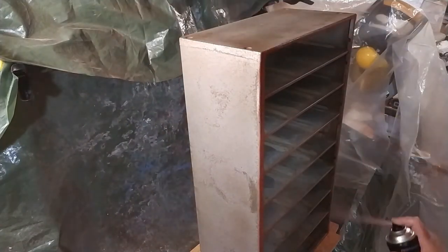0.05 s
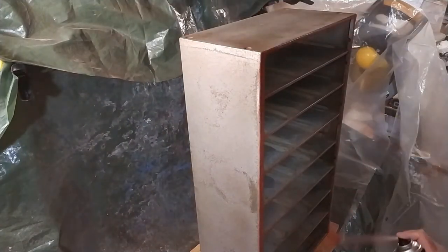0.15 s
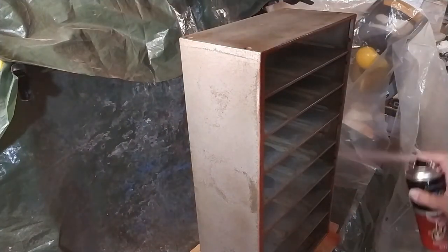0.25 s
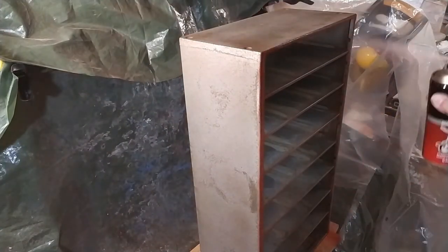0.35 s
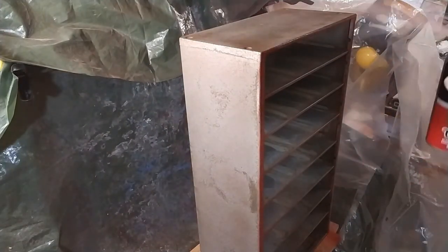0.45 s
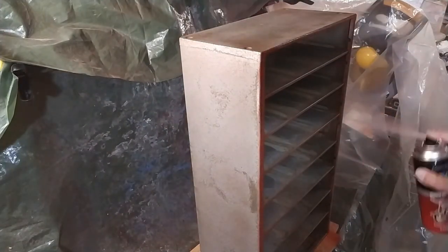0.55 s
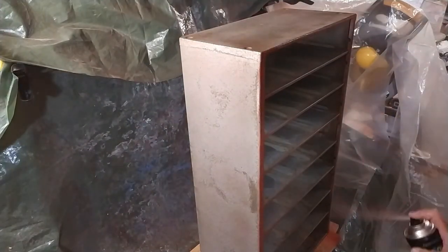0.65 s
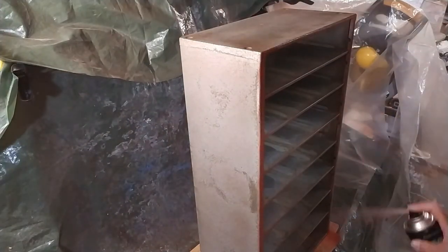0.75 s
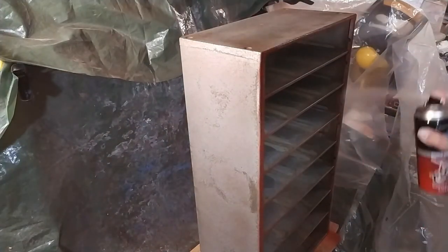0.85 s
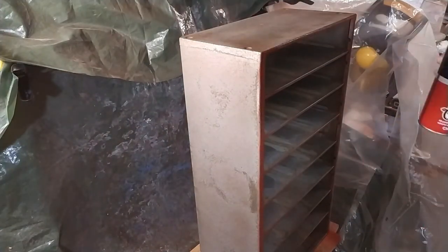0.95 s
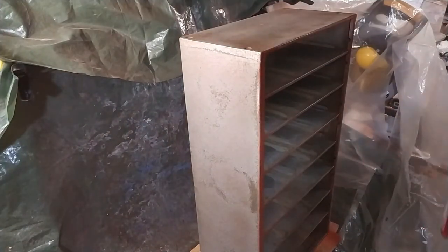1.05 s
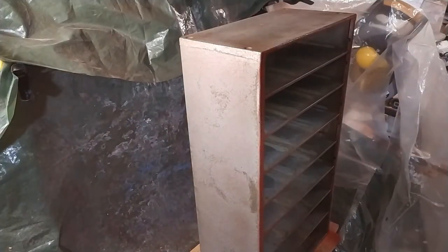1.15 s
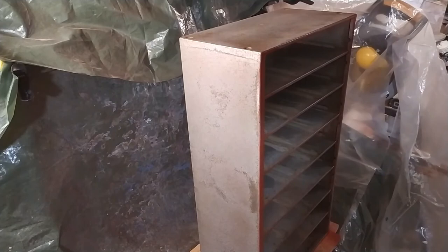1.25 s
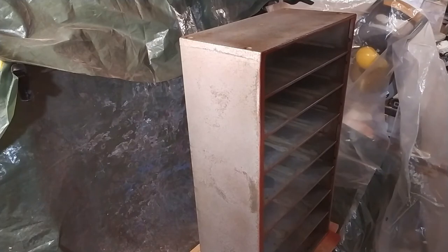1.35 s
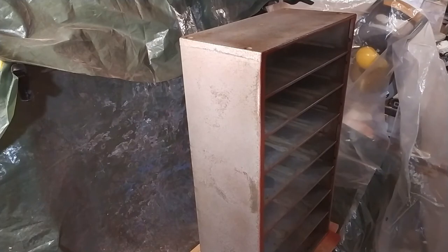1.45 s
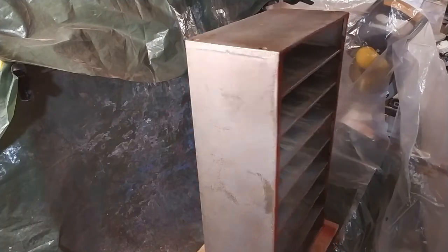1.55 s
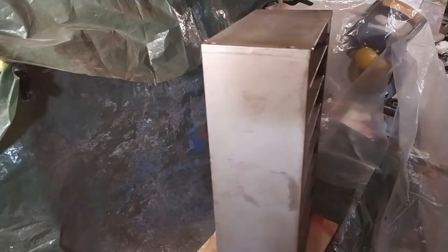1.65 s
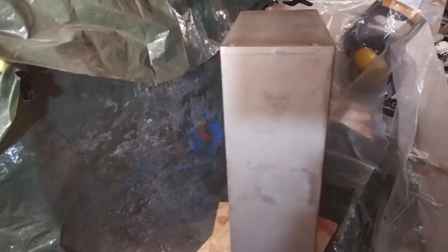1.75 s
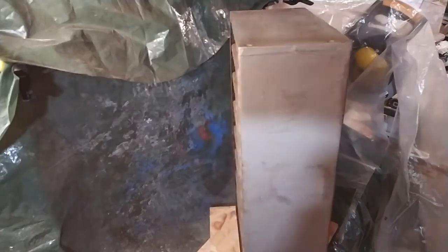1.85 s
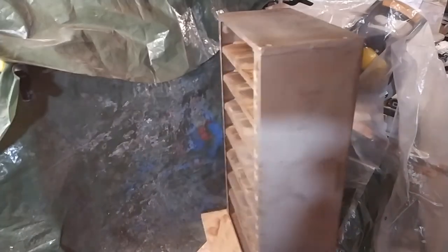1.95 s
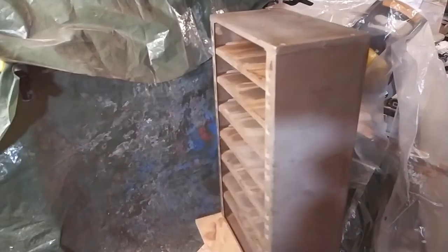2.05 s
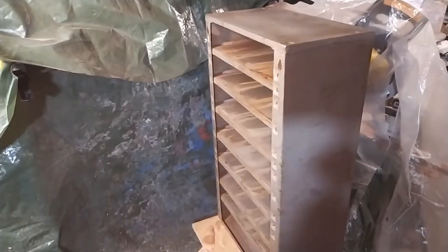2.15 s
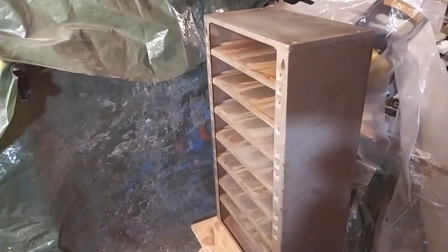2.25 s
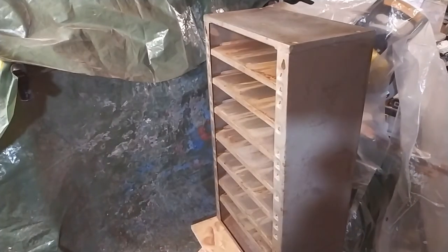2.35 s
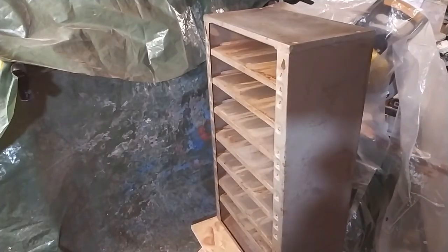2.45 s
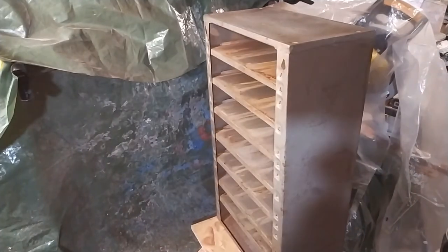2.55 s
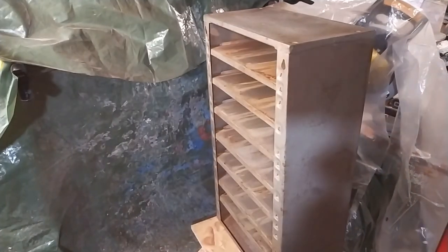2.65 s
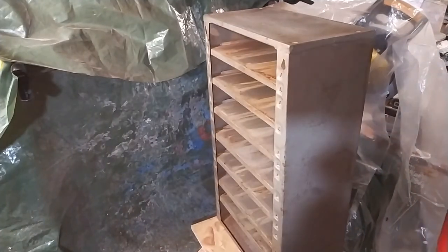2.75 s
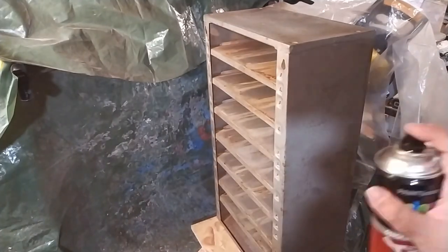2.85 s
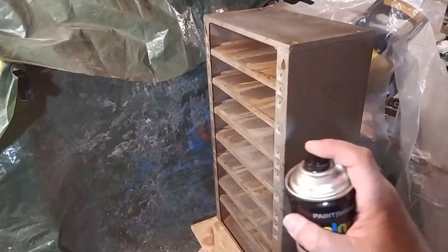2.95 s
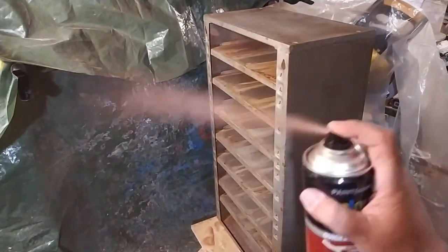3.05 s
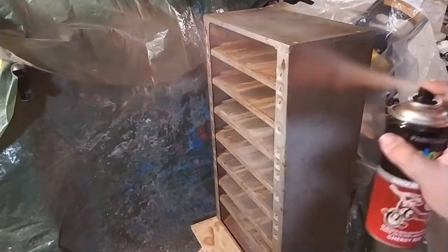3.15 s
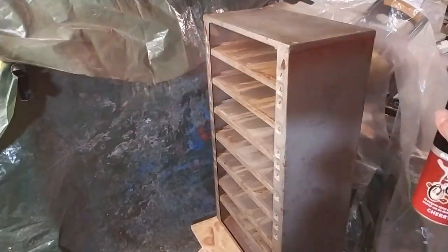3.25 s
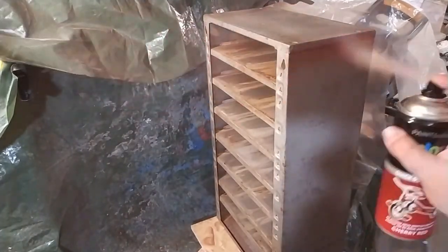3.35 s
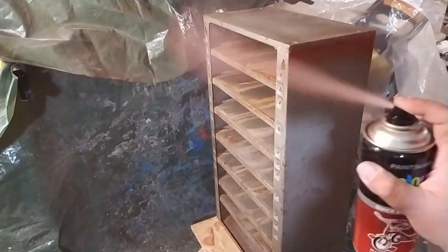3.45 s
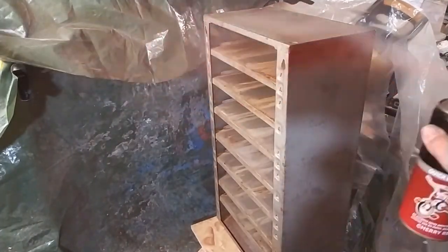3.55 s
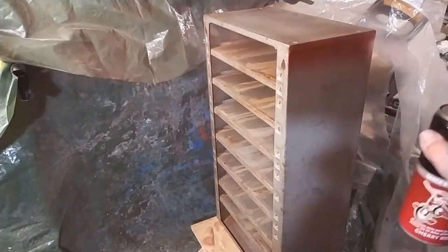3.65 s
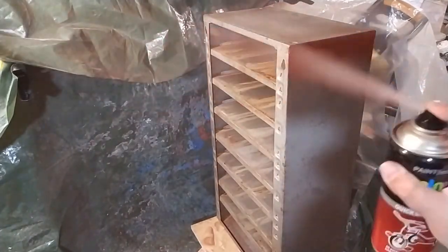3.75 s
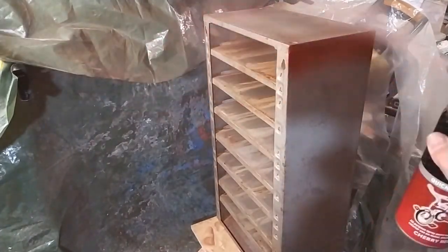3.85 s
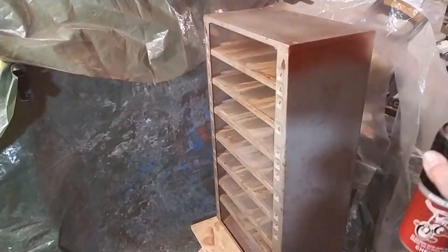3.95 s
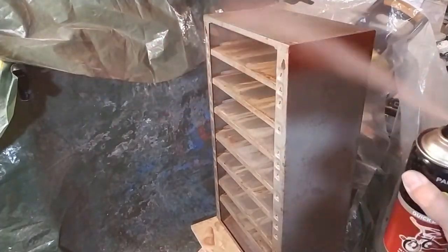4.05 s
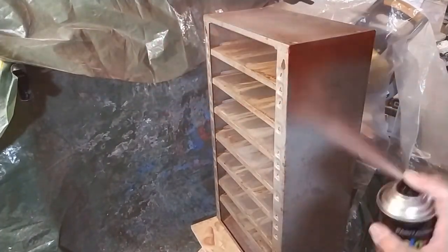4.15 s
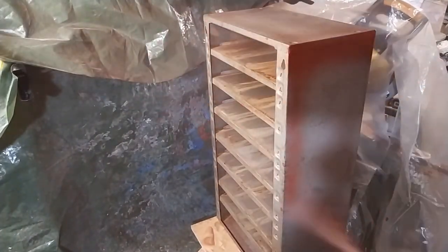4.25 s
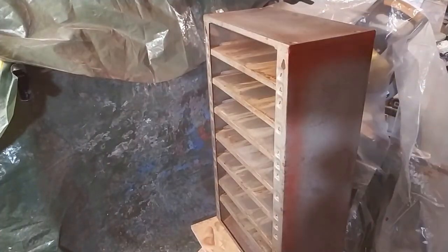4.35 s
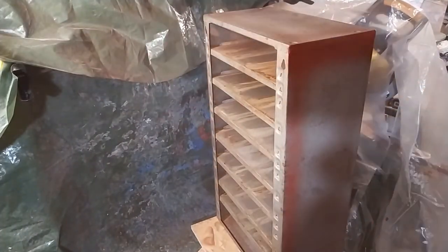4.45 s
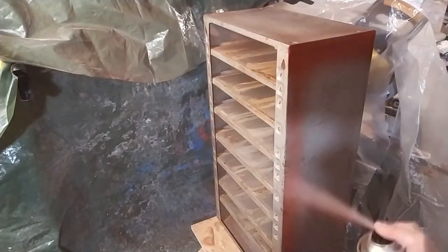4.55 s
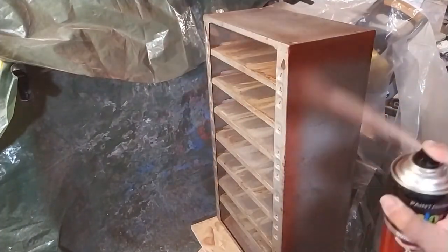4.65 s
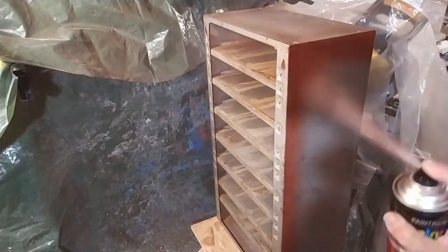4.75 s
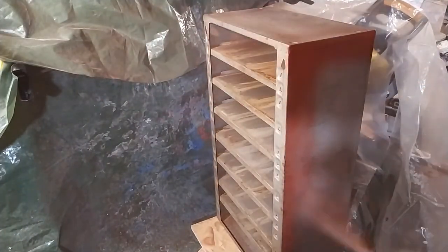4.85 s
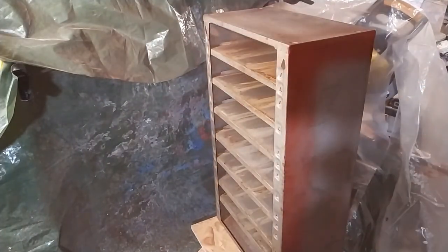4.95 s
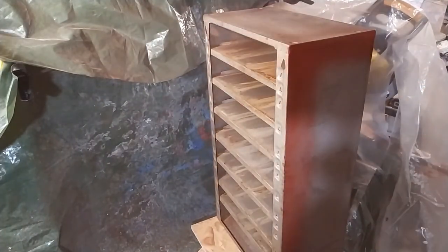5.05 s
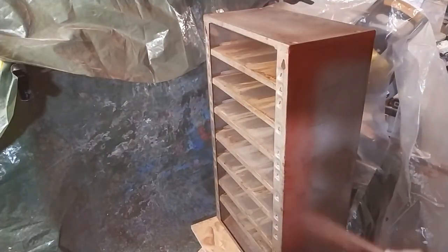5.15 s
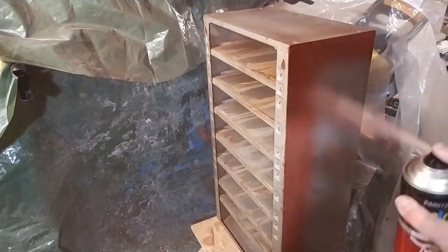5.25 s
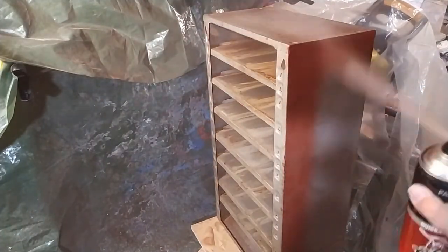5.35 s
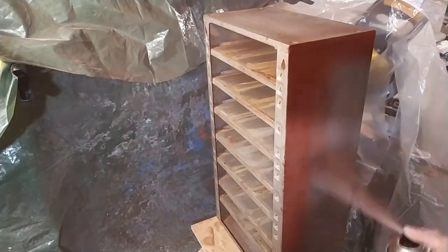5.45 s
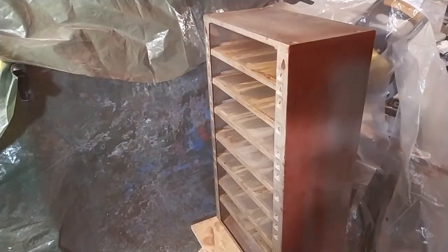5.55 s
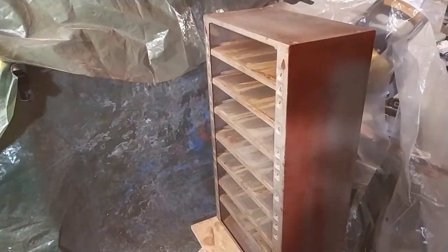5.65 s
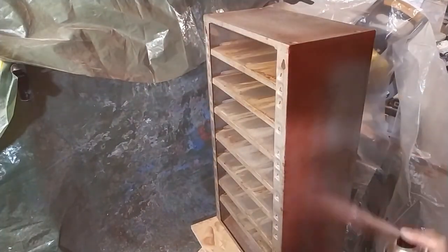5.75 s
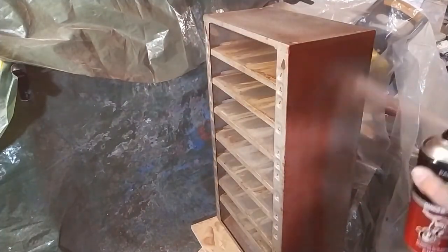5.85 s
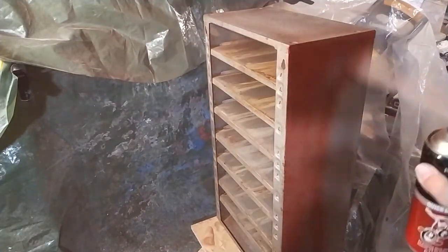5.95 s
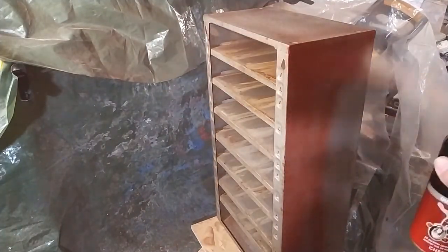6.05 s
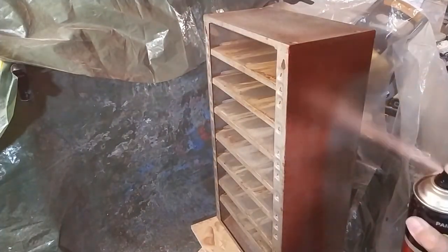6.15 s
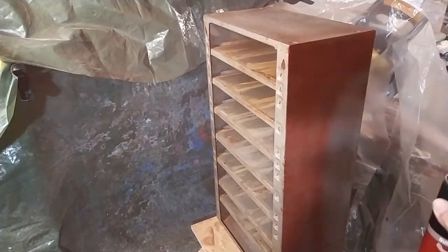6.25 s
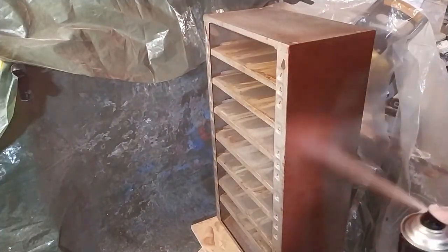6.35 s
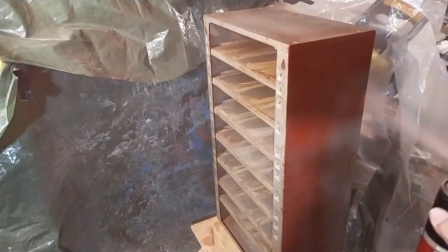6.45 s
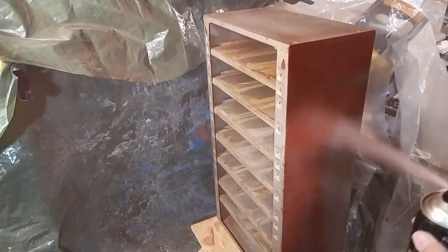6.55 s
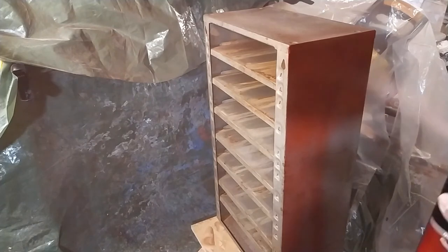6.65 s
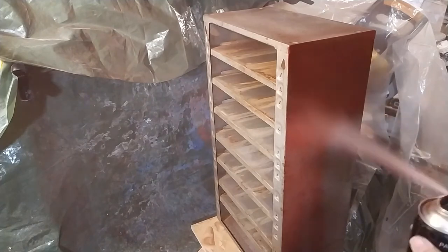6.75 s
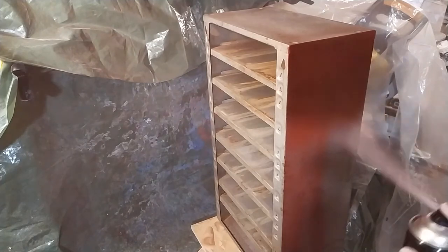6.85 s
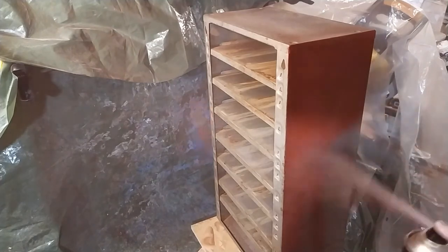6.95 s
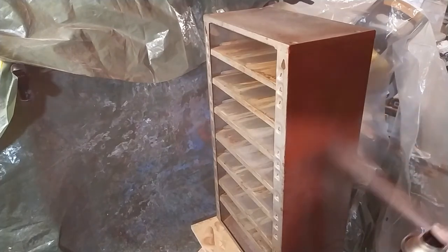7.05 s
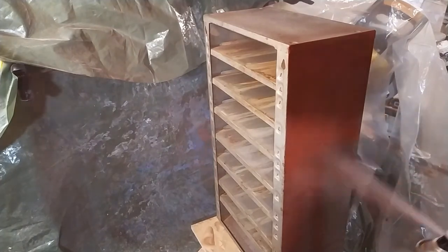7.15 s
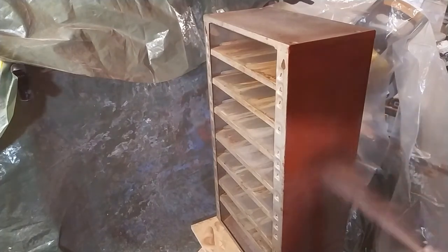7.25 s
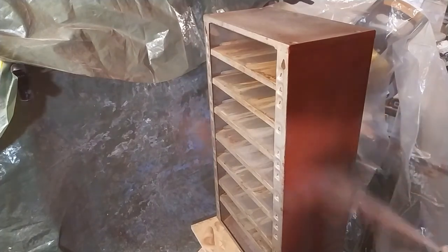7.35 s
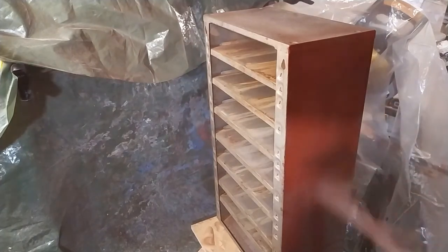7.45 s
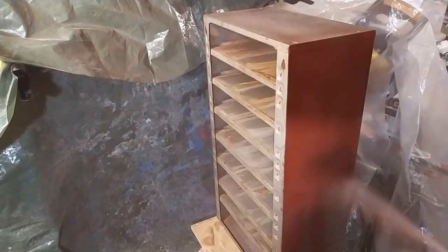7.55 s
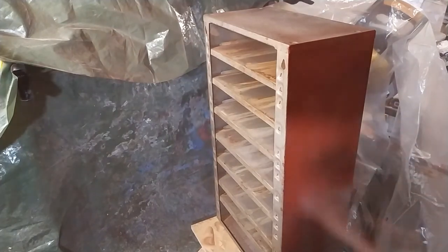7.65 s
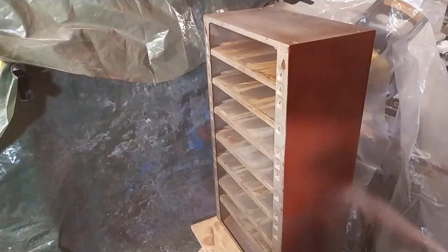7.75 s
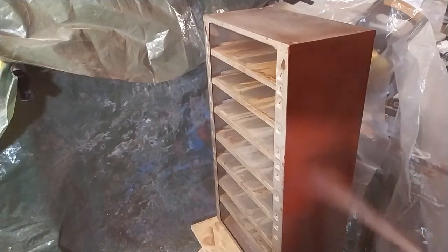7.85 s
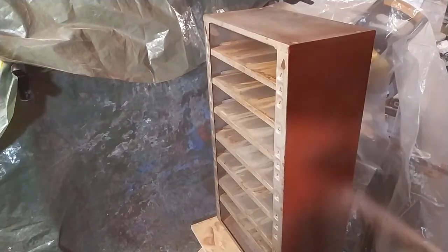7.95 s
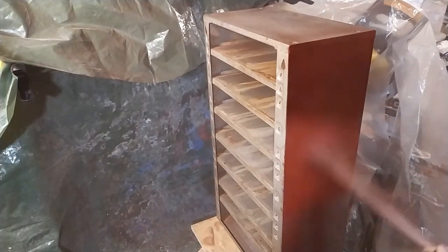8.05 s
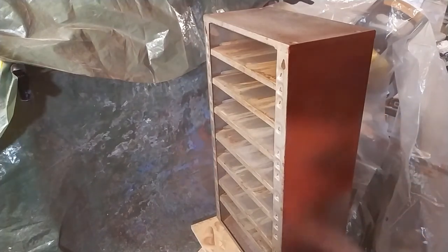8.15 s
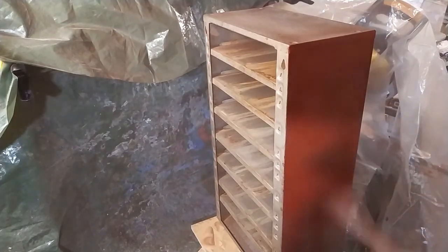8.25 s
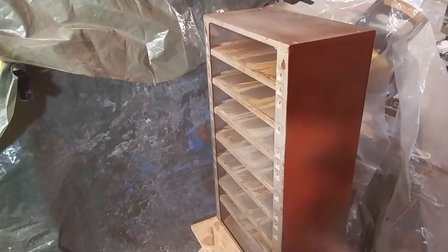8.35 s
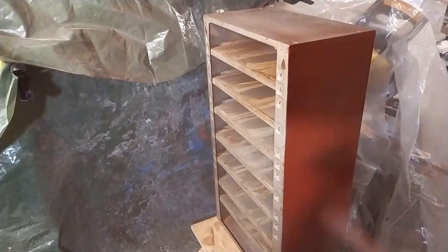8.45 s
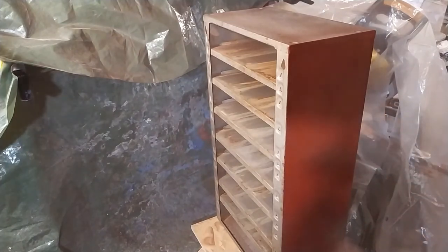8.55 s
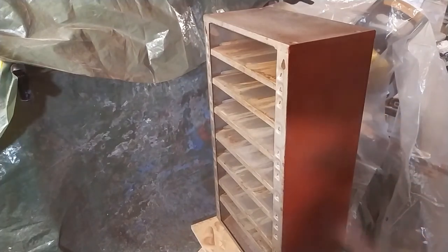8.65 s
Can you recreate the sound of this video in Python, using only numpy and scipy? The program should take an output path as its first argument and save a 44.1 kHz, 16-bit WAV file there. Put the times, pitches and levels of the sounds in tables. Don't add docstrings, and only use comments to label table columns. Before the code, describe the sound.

A close stereo phone pickup inside a small tent of plastic sheeting. From 0 to 0.9 s an aerosol can is already spraying: a bright, turbulent, airy hiss, slightly fluttering, cut off quickly. From about 1 to 3 s the hiss is gone and a wooden rack is turned on its sheet: a faint soft hush, small dull wooden ticks at 1.0 s and scattered onward, sharper plastic snaps and short crisp scrapes, busiest around 1.9-2.3 s, and a tiny high squeak at 2.7 s. At 3.04 s the valve opens abruptly and a stronger spray continues to the end, about 8.7 s, its treble dipping and returning with each hand stroke, several per two seconds, with a hollow, shifting comb-like colour from echoes and light paint spatter on wood. Low street rumble runs throughout; a faint far engine hums from 5.4 s, drops in gear near 6.3 s, then slowly climbs.

```python
import sys
import numpy as np
from scipy import signal
from scipy.fft import rfft, irfft, dct, next_fast_len
from scipy.io import wavfile
from scipy.ndimage import uniform_filter1d, minimum_filter1d, map_coordinates

SR = 44100
rng = np.random.default_rng(int(sys.argv[2]) if len(sys.argv) > 2 else 0)


def boost(x):
    u = np.asarray(x, float) / 20
    return 10 ** u


def wav_out(sig):
    wavfile.write(sys.argv[1], SR, np.round(np.clip(np.atleast_2d(sig).T, -1, 1) * 32767).astype(np.int16))


N = 383229

# valve opens t/s, valve shuts t/s, jet hiss level/dB, extra low sound level/dB
SPRAYS = [
    (-.1, 0.936, -41, 1),
    (3.039, 8.9, -38.5, -0.5),
]
# f/Hz, level/dB per Hz
JET_SPECTRUM = [(1650, -54.5), (2800, -8.5), (4200, -5.5), (5530, -5), (6160, -7), (6920, -6), (14900, 5.2),
                (15600, 9.7)]
# f/Hz, width/Hz, level/dB
NOZZLE_MODES = [(5490, 2800, 5), (3680, 460, -7.5)]
# f/Hz, width/Hz, level/dB
DOME_MODES = [(1909, 650, -0.5), (2630, 290, -6)]
# f/Hz, level/dB per Hz
SPLASH_SPECTRUM = [(160, -51), (270, -30), (335, -1.5), (472, 0.5), (594, -5), (789, -1), (943, -3),
                   (1600, 0), (2080, -29), (3520, -120)]
# delay/ms, drift/ms, drift rate/(1/s), level/dB
ECHO_PATHS = [(.3, .04, 2, -8), (.8, .1, 2, -12), (2, .2, 2.7, -11), (3.1, .4, 3, -8)]
# t/s, nearness level/dB, echo off the rack level/dB
REACH = [(3.1, -2, 3), (4.5, -4.5, 2), (5.5, -3.5, 1.5), (6.2, -3.5, 3), (6.8, -1, 2), (7.4, -5.5, 0),
         (8.69, -3, 0)]
# t/s, loss of treble level/dB
STROKE_ENDS = [(-.3, 5.5), (.13, 0.5), (.73, 0.5), (1.1, 2), (3.0, 1.5), (3.309, 3.5), (3.65, 0.5),
               (3.92, 1), (4.42, 3), (4.73, -2.5), (5.06, 4.5), (5.38, -1), (5.61, 3.5), (5.94, 1.5),
               (6.12, 1), (6.29, 2), (6.448, 4), (6.709, 4), (7.04, -1.5), (7.22, 1), (7.45, -0.5),
               (7.63, 0.5), (7.832, 0.5), (8.05, 1.5), (8.28, 2.5), (8.482, 2.5), (8.69, 3.5)]
# t/s, length/s, f/Hz, level/dB
GLINTS = [(.2, .1, 7400, 3), (0.45, 0.096, 6900, 3), (5, 0.13, 1500, -3), (0.091, 0.17, 1800, -2.5),
          (4, 0.066, 6200, -11), (0.33, 0.3, 5800, -3.5), (0.69, .2, 7300, -9), (0.64, 0.35, 5200, 1.5),
          (6, 0.075, 4700, 4), (3.08, 0.081, 6500, -4), (2.9, 0.2, 1000, -11), (3.7, 0.08, 3100, -15),
          (3.4, 0.15, 5700, -2), (3.65, 0.057, 3150, -14.5), (1.3, 0.22, 7800, -2), (3.3, 0.32, 5300, 0.5),
          (3.6, 0.06, 2400, -6), (5.7, 0.11, 2500, 0.5), (4.0, 0.37, 890, -2), (3.7, 0.35, 5100, 4.5),
          (5.2, 0.15, 5200, 0), (5, 0.084, 2400, 10), (5.3, .08, 4200, -2), (5.2, .2, 3500, 1.5),
          (5.03, 0.12, 2700, -3), (.75, 0.24, 7350, 6), (2.8, 0.11, 2800, -1.5), (5.65, 0.16, 2000, 3.5),
          (5.65, .2, 2100, -7.5), (0.51, 0.23, 2050, -7.5), (0.14, 0.87, 640, 4.5), (4.9, 0.079, 1800, -3),
          (5.3, 0.33, 480, 2), (5.3, 0.59, 5100, 3), (7.7, 0.11, 10000, -5), (6.4, 0.54, 2000, 3.5),
          (6.4, 0.44, 2300, -4.5), (4.6, 0.26, 5500, 0.5), (7.6, 0.44, 5100, 1), (7.5, 0.064, 4300, -5),
          (7.9, 0.63, 2800, 6), (8.55, 0.15, 4200, -2), (9.8, 0.19, 4150, -3), (8.3, 0.3, 1800, -1.5),
          (6.6, 0.26, 8500, 6.5), (4.9, 0.15, 190, -13), (5.4, 0.086, 820, -2.5), (7.75, 0.09, 620, -3.5),
          (6.5, .2, 1450, -5)]
# f/Hz, exponent/1
STREAKS = [(300, .45), (1500, .4), (5000, .3), (9000, .12), (15000, .2)]
# f/Hz, half width/Hz, level/dB
SHELF_WAVES = [(643, 60, 0.5), (942, 35, -5), (1315, 54, 3), (1438, 100, -3.5), (2438, 80, -2.5)]
# f/Hz, exponent/1
CONTRAST = [(300, .9), (1500, 1), (3000, 1), (7500, .95), (10000, 1.3)]
# t/s, level/dB
HUSH = [(.96, -59.5), (1.4, -62), (1.6, -60.5), (2.2, -59.5), (2.4, -60.5), (3.05, -58.5)]
# f/Hz, level/dB per Hz
SHEET_SPECTRUM = [(110, -62), (190, -10.5), (270, -9.5), (336, 3.5), (472, 3.5), (945, 1), (1520, 4.5),
                  (2590, 0.5), (4650, -3), (7000, -12.5), (9100, -21), (15400, -120)]
# f/Hz, level/dB per Hz
CRISP_SPECTRUM = [(3240, -23), (5500, 7.5), (8000, 4.5), (9260, 6), (12000, 3.5), (15600, 5.5),
                  (16000, -2.5)]
# t/s, level/dB, length/s
SCRAPES = [(1.085, -77, 0.032), (1.232, -87, .02), (1.523, -66, 0.026), (1.765, -73, 0.0092),
           (2.134, -69, 0.036), (2.172, -55, 0.01), (2.219, -58, 0.022), (2.477, -83, 0.011),
           (2.59, -76, 0.0062), (2.708, -91, 0.045), (2.825, -76, 0.031), (2.89, -74, 0.014),
           (2.718, -86, 0.1), (2.88, -89, 0.056)]
# t/s, peak level/dB, ring f/Hz
TICKS = [(1.0168, -43.5, 750), (1.0174, -38.5, 1530), (1.069, -48.5, 1300), (1.272, -44, 2260),
         (1.408, -50, 1650), (1.519, -53, 1270), (1.592, -41, 2060), (1.674, -46, 1290), (1.703, -51, 700),
         (1.8935, -47, 700), (1.894, -41, 1330), (1.918, -45, 1610), (1.955, -45, 1500), (2.09, -56, 800),
         (2.116, -58, 1500), (2.167, -44, 2090), (2.213, -42, 2200), (2.225, -47, 1300), (2.233, -40, 1900),
         (2.242, -48, 1500), (2.29, -55, 1230), (2.401, -43, 1560), (2.408, -42, 1980), (2.468, -46, 1920),
         (2.503, -43, 1570), (2.635, -57, 1300), (2.733, -50, 1230), (2.978, -50, 1540),
         (3.015, -42.5, 1540), (3.049, -40, 2500)]
# t/s, peak level/dB, ring f/Hz, crack level over the ring/dB
SNAPS = [(1.0811, -49, 5290, -25), (1.4049, -49, 3010, -22), (1.5226, -48, 5350, -8),
         (1.5914, -56, 3300, -17), (1.6169, -51, 3740, -20), (1.7047, -55, 3070, -19),
         (1.7466, -58, 3040, -16), (1.8084, -59, 4520, -19), (1.8928, -56, 4020, -19),
         (1.9165, -40, 4300, -19), (1.9965, -53, 4000, -14), (2.0735, -54, 5600, -16),
         (1.291, -55, 4800, -18), (2.0235, -52, 3810, -8), (2.0452, -41, 4280, -12),
         (2.0659, -50, 4940, -22), (2.1157, -52, 4310, -8), (2.1685, -47, 3600, -4),
         (2.476, -52, 4020, -17), (2.5, -47, 4110, -21), (2.5463, -56, 3500, -15), (2.5815, -54, 5000, -8),
         (2.5885, -51, 4980, -8), (2.718, -51, 5000, -1), (2.813, -55, 4800, -16), (2.6341, -53, 3090, -17)]
# t/s, peak level/dB, f/Hz
SQUEAKS = [
    (2.7162, -49, 9400),
    (2.821, -56, 9350),
    (2.8933, -58, 9320),
]
# t/s, f/Hz, level/dB
ENGINE_GEARS = [
    [(5.3, 96, -70), (5.41, 95, -63), (5.7, 93.5, -63), (5.93, 94.5, -60), (6.104, 74, -62),
     (6.25, 73, -64)],
    [(6.3, 60.2, -70), (6.47, 60, -55), (6.53, 68, -62), (6.75, 70.6, -54.5), (7.01, 73.5, -59),
     (7.72, 75, -61), (8.36, 77.3, -59), (8.47, 80.3, -80), (8.56, 84, -63), (8.69, 84.3, -62)],
]
# f/Hz, level/dB per Hz
STREET_SPECTRUM = [(12, -19.5), (20, -2), (38, -14), (72, -9.5), (140, -19), (180, -85), (310, -120)]
# f/Hz, level/dB per Hz
BOOM_SPECTRUM = [(71, -53), (120, -17), (175, -3.5), (235, -14.5), (300, -1.5), (390, -10.5), (660, -120)]
# t/s, level/dB
TRAFFIC = [(0, 0.5), (.9, 1.5), (1.2, -5), (1.7, 2), (2.2, -0.5), (2.6, -2.5), (3.5, 1), (4.7, 0.5),
           (5.2, 1), (8.4, -1), (8.62, 3)]
# f/Hz, correlation/1
LIKENESS = [(30, 0.1), (60, 0.5), (130, 0.8), (290, 0.5), (640, 0.58), (1410, 0.25), (3100, 0), (6820, 0.2),
            (15000, -0.41)]
# f/Hz, left over right level/dB
PORTS = [(60, 7), (110, 0), (200, 16.5), (380, 3.5), (700, 6), (1290, 3.5), (2380, 0.5), (4400, -0.5),
         (8120, -2), (15000, -3)]
# f/Hz, rounding step/dB, weakest band kept/dB, deepest valley kept/dB
COARSENESS = [(80, -62, -62, -30), (200, -60, -45, -9), (450, -60, -51, -7), (1100, -57, -51, -6.5),
              (1600, -46, -45, -5.5), (2500, -36, -47, -6), (7000, -33.5, -48, -2.7),
              (10000, -32, -49, -1.8), (14500, -29, -52, -2), (15500, -33, -70, -20)]


def unit(x):
    return x / np.sqrt(np.mean(x ** 2) + 1e-20)


def along(points, hz):
    f, v = np.transpose(points)
    return np.interp(np.log(hz + 1), np.log(f + 1), v)


def curves(rows, before=None, after=None):
    s, *cols = np.transpose(rows)
    return [np.interp(np.arange(N) / SR, s, c, before, after) for c in cols]


def wobble(rate):
    knots = rng.standard_normal(int(N * rate / SR) + 4)
    return map_coordinates(knots, [np.arange(N) * rate / SR])


def filtered(x, response):
    m = next_fast_len(N + SR // 4)
    return irfft(rfft(x, m) * response(np.fft.rfftfreq(m, 1 / SR)), m)[..., :N]


def shape(spectrum):
    return lambda hz: boost(along(spectrum, hz))


def modes(table):
    def response(f):
        total = 0
        for k, (center, width, db) in enumerate(table):
            damping = 1j * f * width
            total = total + (-1) ** k * boost(db / 2) * damping / (center * center - f * f + damping)
        return total ** 2
    return response


def field(grid, wide, long):
    patches = uniform_filter1d(rng.standard_normal(grid), wide, -2)
    return unit(uniform_filter1d(patches, long, -1))


def lean_left(db):
    return boost([[db / 2], [-db / 2]])


def diffuse(response, patchy_db):
    z = signal.stft(rng.standard_normal((2, N)), nperseg=512)[2]
    z = z * boost(patchy_db * field(z.shape[1:], wide=5, long=10))
    pair = signal.istft(z, nperseg=512)[1][:, :N]

    def mid_side_response(hz):
        turn = np.arccos(np.clip(along(LIKENESS, hz), -1, 1)) / 2
        return response(hz) * [np.cos(turn), np.sin(turn)]
    mid, side = filtered(pair, mid_side_response)
    return unit(np.array([mid + side, mid - side]))


def spray():
    flow, low_db = valve()
    near_db, echo_db = curves(REACH)
    aim_db = strokes()
    flutter = boost(0.62 * wobble(18) + 0.56 * wobble(70) + 0.56 * wobble(400))
    bursts = np.minimum(rng.exponential(size=N), 3) * (rng.random(N) < .03)
    drops = rng.standard_normal(N) * boost(0.73 * bursts)
    heard = unit(echoes(unit(flutter * drops), lag_ms=.083))
    air = unit(heard + boost(-2.5) * diffuse(lambda hz: 1 + 0 * hz, patchy_db=2.5))

    beam_hz, mid_share, dome_share = 10340, 0.4, 0.23
    jet = unit(filtered(air, shape(JET_SPECTRUM))) * boost(7.5)
    wide = filtered(jet, lambda hz: 1 / (1 + (hz / beam_hz) ** 4))
    jet = wide * boost(mid_share * aim_db) + (jet - wide) * boost(aim_db + near_db)
    whistle = unit(filtered(air, modes(NOZZLE_MODES))) * boost(-20.5 + mid_share * aim_db)
    dome = unit(filtered(air, modes(DOME_MODES))) * lean_left(3)
    dome = dome * boost(-17 + low_db + echo_db + dome_share * aim_db)
    splash = diffuse(shape(SPLASH_SPECTRUM), patchy_db=2.0) * lean_left(1.6)
    splash = splash * boost(-21 + low_db + .5 * echo_db)
    mix = (jet + whistle) * lean_left(2) + dome + splash
    return boost(3.0) * flow * speckle(mix, depth=.8, own=.6, wide=3, long=5)


def valve():
    press_s, surge_db, surge_s, let_go_s = 0.041, 1, 0.024, 0.029
    t = np.arange(N) / SR
    flow, low_db = np.full(N, 1e-7), np.zeros(N)
    for start, end, db, body_db in SPRAYS:
        since = np.clip(t - start, 0, None)
        surge = boost(surge_db * np.exp(-((since - press_s) / surge_s) ** 2))
        opening = np.clip(since / press_s, 0, 1) * surge
        flow += boost(db) * opening * boost(-20 * np.clip(t - end, 0, None) / let_go_s)
        low_db[t >= start] = body_db
    return flow, low_db


def strokes():
    s = np.transpose(STROKE_ENDS)[0]
    count = np.interp(np.arange(N) / SR, s, np.arange(len(s)))
    return -curves(STROKE_ENDS)[0] * np.cos(np.pi * count) ** 2


def echoes(jet, lag_ms):
    late_ms, gain = [np.zeros(N), np.full(N, lag_ms)], [1]
    for ms, drift, rate, db in ECHO_PATHS:
        shared = wobble(rate)
        late_ms += [ms + drift * (shared + .3 * wobble(rate)) for _ in range(2)]
        gain += [boost(db)]
    heard_at = np.arange(N) - np.array(late_ms) * SR / 1000
    copies = map_coordinates(jet, [heard_at], order=3, mode="nearest")
    return np.tensordot(gain, copies.reshape(-1, 2, N), 1)


def speckle(x, depth, own, wide, long):
    hz, t, z = signal.stft(x, SR, nperseg=1024)
    s, length, at_hz, size_db = np.transpose(GLINTS)[..., None]
    across = size_db * np.exp(-((hz - at_hz) / 255) ** 2)
    glint_db = across.T @ np.exp(-((t - s) / length) ** 2)
    for center_hz, width_hz, db in SHELF_WAVES:
        glint_db += (db * np.exp(-((hz - center_hz) / width_hz) ** 2))[:, None]

    grid = z.shape[1:]
    paths = np.array([field(grid, wide, long) + 1j * field(grid, wide, long) for _ in range(3)])
    gain = np.abs(paths[2] + own * paths[:2]) ** (depth * along(CONTRAST, hz))[:, None]
    power = uniform_filter1d(np.abs(z) ** 2, size=3, axis=2) + 1e-20
    prominence = power / uniform_filter1d(power, size=9, axis=1)
    gain = gain * prominence ** along(STREAKS, hz)[:, None]
    raised = np.mean(gain ** 2 * power, (0, 2)) / np.mean(power, (0, 2))
    gain /= np.sqrt(uniform_filter1d(raised, size=15))[:, None]
    return signal.istft(z * unit(gain) * boost(glint_db), nperseg=1024)[1][:, :N]


def rustle():
    t = np.arange(N) / SR
    faded_db = -9
    hush = boost(curves(HUSH, HUSH[0][1] + faded_db, HUSH[-1][1] + faded_db)[0])
    scrape = np.zeros(N)
    for s, db, length in SCRAPES:
        side_s = length * np.where(t < s, 0.45, 1.3)
        scrape += boost(db) * np.exp(-((t - s) / side_s) ** 2)
    crinkle = boost(1.3 * wobble(60) + 1.3 * wobble(300))
    body = unit(crinkle * diffuse(shape(SHEET_SPECTRUM), patchy_db=1.5))
    crisp = unit(crinkle * diffuse(shape(CRISP_SPECTRUM), patchy_db=1.2))
    body_level = boost(3.0) * hush + boost(1.5) * scrape
    crisp_level = boost(-10.5 + 2.5) * hush + boost(3.0) * scrape
    return body_level * body + crisp_level * crisp


def ticks():
    out, t = np.zeros((2, N)), np.arange(SR // 16) / SR

    def place(s, sound):
        out[:, round(s * SR):][:, :len(t)] += sound

    for s, db, hz in TICKS:
        u = t * hz / 0.83
        tone = np.sin(2 * np.pi * hz * t) + boost(-5.5) * np.sin(2 * np.pi * 0.44 * hz * t)
        ring = tone * u * np.exp(1 - u)
        noise = uniform_filter1d(rng.standard_normal((2, len(t))), size=5)
        shadow = boost(-8.5 - 60 * t / 0.032) * noise * np.minimum(u, 1)
        place(s, boost(db + 1) * (ring + shadow))
    for s, db, hz, crack_db in SNAPS:
        ring = np.sin(2 * np.pi * hz * t) * boost(-60 * t / .004)
        noise = np.diff(rng.standard_normal((2, len(t))), prepend=0)
        crack = boost(crack_db + 2.5 - 60 * t / .012) * noise
        place(s, boost(db + 3) * (ring + crack))
    for s, db, hz in SQUEAKS:
        swell = 1 - np.exp(-t / 0.0026)
        place(s, boost(db - 60 * t / 0.025) * swell * np.sin(2 * np.pi * hz * t))
    return out


def street():
    pass_s, pass_wide_s, pass_db = 6.7, 0.45, 3
    passing_db = pass_db * np.exp(-((np.arange(N) / SR - pass_s) / pass_wide_s) ** 2)
    near_db = passing_db + curves(TRAFFIC)[0]
    rumble_db = -61.5 + near_db + 0.86 * wobble(4)
    boom_db = -70.5 + 1.1 * near_db + 1.1 * wobble(6.1) + 0.93 * wobble(13)
    out = boost(rumble_db) * diffuse(shape(STREET_SPECTRUM), patchy_db=2.0)
    out = out + boost(boom_db) * diffuse(shape(BOOM_SPECTRUM), patchy_db=4.5)
    for rows in ENGINE_GEARS:
        hz = curves(rows)[0]
        db = uniform_filter1d(curves(rows, -110, -110)[1], size=2000)
        phase = 2 * np.pi * np.cumsum(hz) / SR + .15 * wobble(9)
        out = out + boost(db + 0.5 + 1.5 * wobble(8)) * np.sin(phase)
    return out


def scene():
    def lean(hz):
        return boost(np.outer([.5, -.5], along(PORTS, hz)))

    def late(x):
        return np.array([x[0], np.roll(x[1], 7)])

    uneven = filtered(spray() + late(rustle()) + street(), lean)
    microphone_hiss = boost(-76.5) * rng.standard_normal((2, N))
    return uneven + late(ticks()) + microphone_hiss


def thin_bands(x, ease, scatter_db):
    frame, grid, top_hz = 1024, 450, 15790
    count, lead = N // frame + 3, 2 * frame - grid
    window = np.sin(np.pi * (np.arange(2 * frame) + .5) / (2 * frame))
    padded = np.pad(x, ((0, 0), (lead, (count + 1) * frame - N - lead)))
    blocks = padded.reshape(2, -1, frame)
    overlapped = np.concatenate([blocks[:, :-1], blocks[:, 1:]], 2) * window
    a, b, c, d = np.split(overlapped, 4, 2)
    lines = dct(np.concatenate([-c[..., ::-1] - d, a - b[..., ::-1]], 2), type=4, norm="ortho")

    edges = 4 * (np.arange(50) + np.arange(50) ** 3 // 600)
    widths = np.diff(edges, append=frame)
    hz = (edges + widths / 2) * SR / 2 / frame
    limits = np.array(COARSENESS)
    quiet_db = np.minimum(10 * np.log10(np.mean(lines ** 2, axis=(0, 2)) + 1e-12) + 37, 0)
    quiet_db = minimum_filter1d(quiet_db, size=2)
    budget_db = ease * quiet_db[:, None] + scatter_db * field((len(edges), count), wide=1, long=3).T
    step_db = along(limits[:, [0, 1]], hz) + budget_db
    gate_db = along(limits[:, [0, 2]], hz) + budget_db

    summed = np.repeat(field((len(edges), count), wide=2, long=4).T > -.2, widths, -1)

    def rotate(v):
        return np.where(summed, np.array([v[0] + v[1], v[0] - v[1]]) / np.sqrt(2), v)

    lines = rotate(lines)

    def near(size, span):
        return uniform_filter1d(uniform_filter1d(np.sum(lines ** 2, 0), size, 1), span, 0)

    valley_ease = np.where(hz > 7000, ease / 50, ease)
    valley_db = along(limits[:, [0, 3]], hz) + valley_ease * quiet_db[:, None]
    masked = near(7, 3) < near(70, 3) * boost(2 * np.repeat(valley_db, widths, -1))
    strong = np.add.reduceat(lines ** 2, edges, axis=2) / widths > boost(2 * gate_db)
    step = np.repeat(boost(step_db), widths, -1)
    rounded = np.sign(lines) * np.floor(np.abs(lines) / step + .4) * step
    kept = rotate(rounded * np.repeat(strong, widths, -1))
    kept = rotate(rotate(kept)) * ~masked
    kept[..., round(top_hz * 2 * frame / SR):] = 0

    p, q = np.split(dct(kept, type=4, norm="ortho"), 2, 2)
    folded = np.concatenate([q, -q[..., ::-1], -p[..., ::-1], -p], 2) * window
    joined = folded[:, :-1, frame:] + folded[:, 1:, :frame]
    return joined.reshape(2, -1)[:, lead - frame:][:, :N]


def roll_off(x):
    return signal.sosfilt(signal.butter(12, 16000, fs=SR, output="sos"), x)


def record(dry):
    mix = thin_bands(dry, ease=3, scatter_db=2.2)
    return roll_off(mix)


dry = scene()
out = record(dry)
wav_out(out)
```